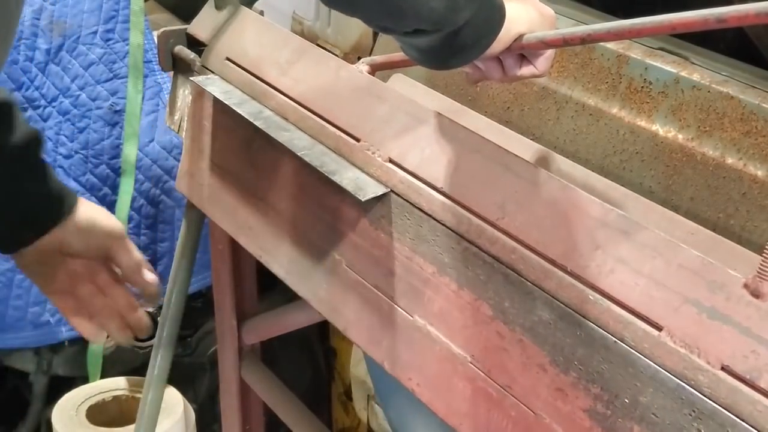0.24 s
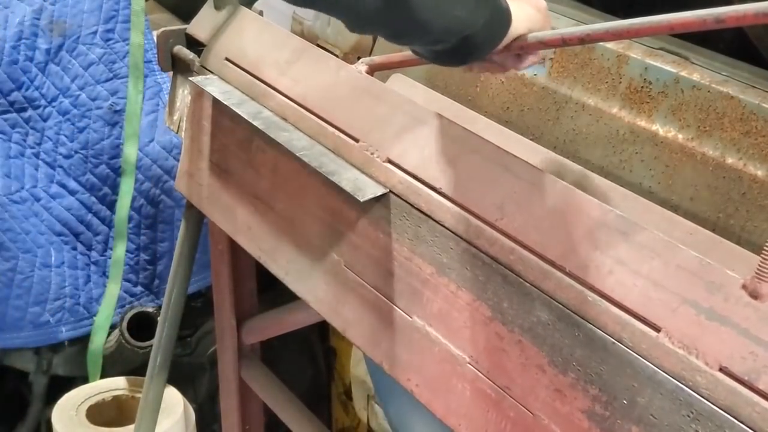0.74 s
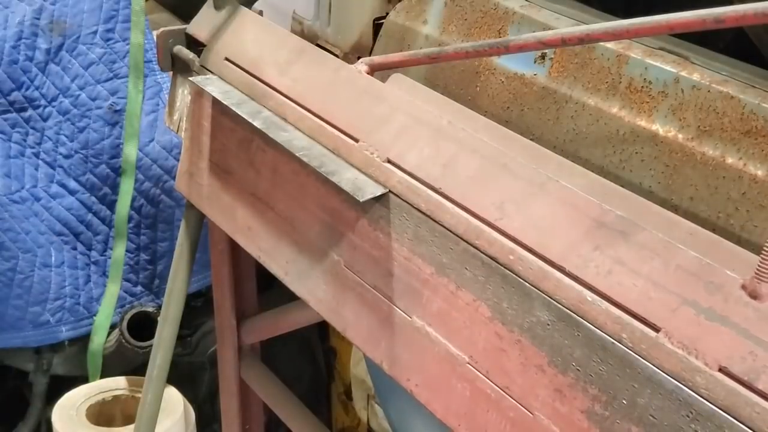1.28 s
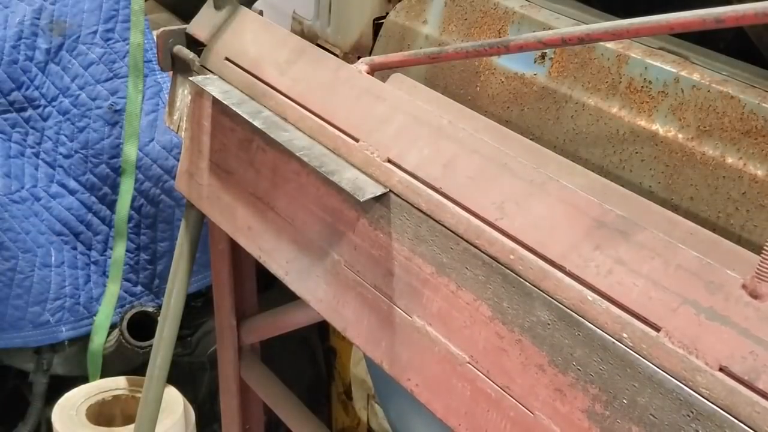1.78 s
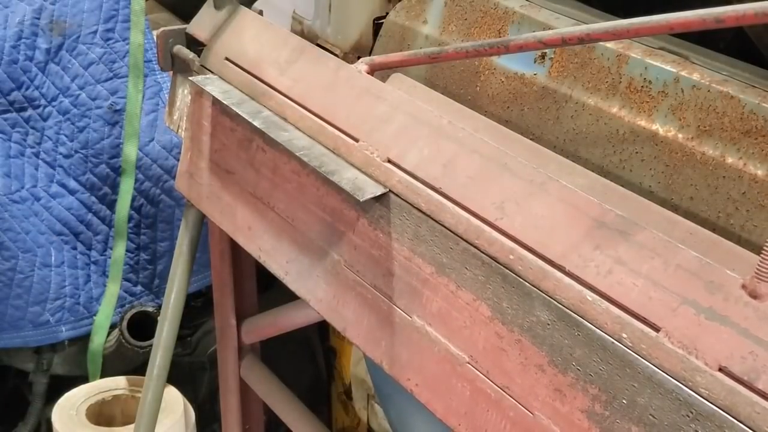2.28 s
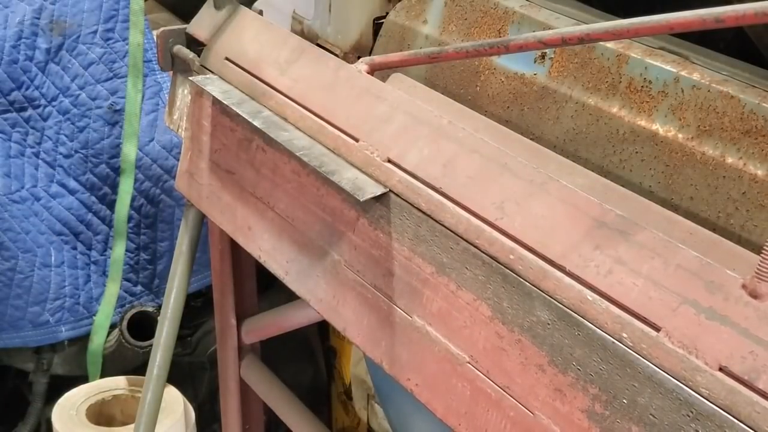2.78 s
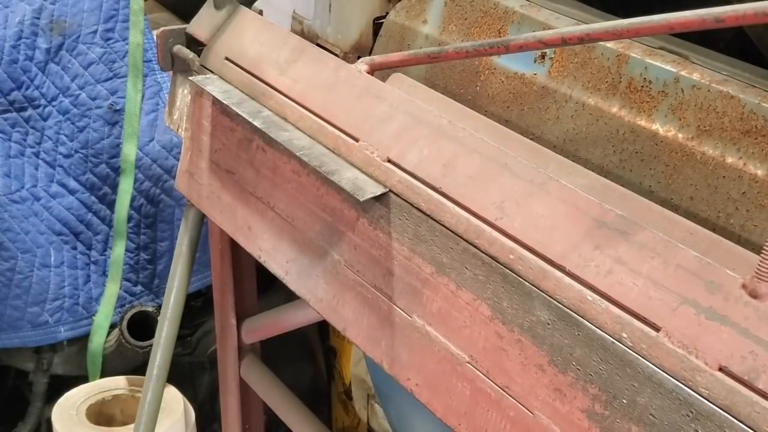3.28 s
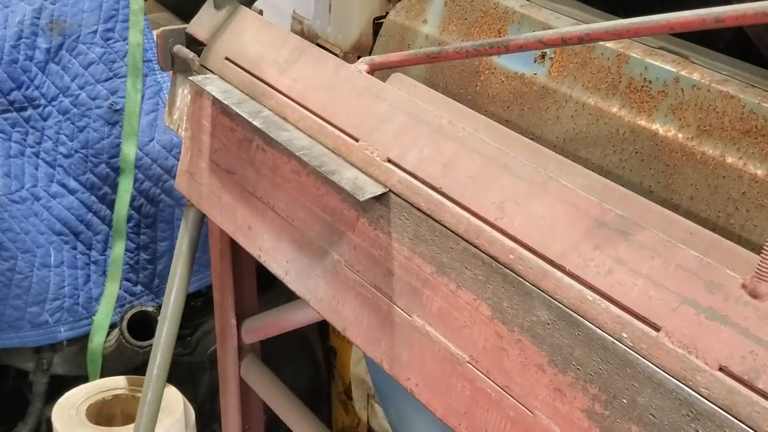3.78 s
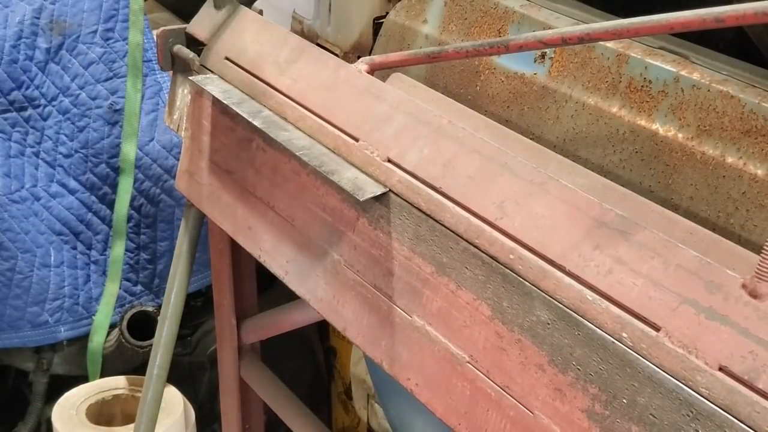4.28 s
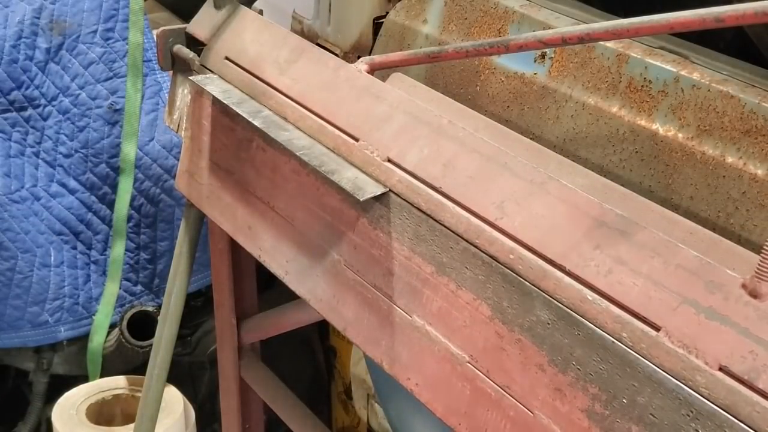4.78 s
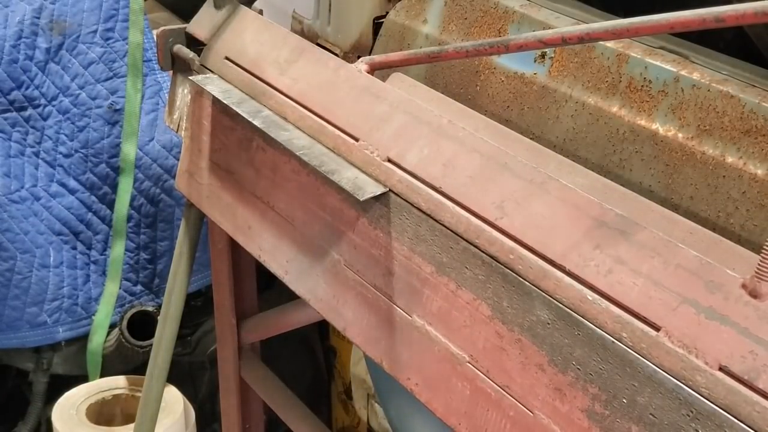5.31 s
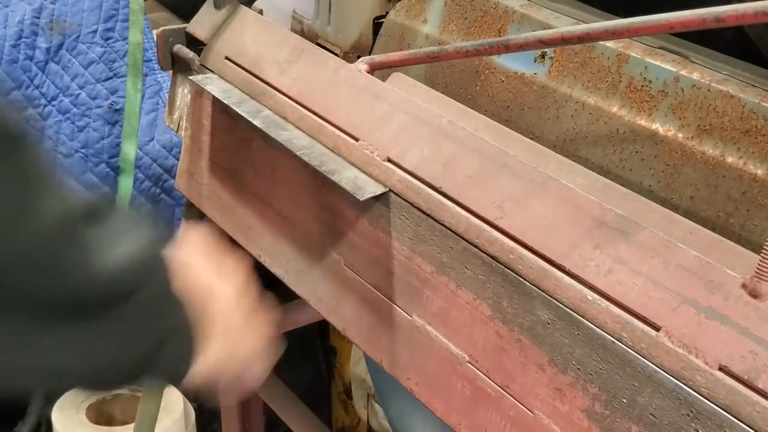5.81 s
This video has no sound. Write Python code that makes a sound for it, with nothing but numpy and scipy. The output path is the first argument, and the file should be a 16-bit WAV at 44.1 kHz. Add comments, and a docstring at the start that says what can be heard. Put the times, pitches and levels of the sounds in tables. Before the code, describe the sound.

A metal brake handle knocks back, feet scuff on grit, then a heavy steel plate is dragged in two harsh, screeching, ringing pulls in a workshop.

```python
"""A workshop with a manual sheet metal brake: its handle drops back and knocks; someone steps away on grit.
Out of sight a steel plate is dragged in two long pulls, then shifted once more with a light clank.
Streams of random fractures, coloured and enveloped, make rasp, grit, judder and scuffs.
Noise-fed resonators make the plate ring; pumped ones screech; clicks into resonators knock, thud and tick.
Filtered noise makes the air and the floor rumble; a dense decaying tail makes the room."""
import sys
import numpy as np
from scipy import signal
from scipy.fft import rfft, irfft, next_fast_len
from scipy.io import wavfile
from scipy.ndimage import map_coordinates

SR = 44100
rng = np.random.default_rng(int(sys.argv[2]) if len(sys.argv) > 2 else 0)


def unload_audio(sound):
    """Save the sound as a 16-bit wav file, at the path given as the first command line argument."""
    columns = np.transpose(np.atleast_2d(sound))
    # keep every value between -1 and 1, then stretch to whole-number steps
    steps = np.round(np.clip(columns, -1, 1) * 32767)
    wavfile.write(sys.argv[1], SR, steps.astype(np.int16))


N = 266805
TIME = np.arange(N) / SR


def from_db(db):
    """Decibels to gain."""
    return 10 ** (np.asarray(db) / 20)


def rms_one(x):
    """Scale to rms 1."""
    return x / np.sqrt(np.mean(x ** 2) + 1e-20)


def at_hz(points, hz):
    """Read a table on a log-frequency axis."""
    known_hz, values = np.transpose(points)
    return np.interp(np.log(np.maximum(hz, 1)), np.log(known_hz), values)


def drift(per_s):
    """Random line through `per_s` normal values a second."""
    return np.interp(TIME * per_s, np.arange(8000), rng.standard_normal(8000))


def envelope(s, rise_s, length_s, t60_s):
    """Rise from `s`, hold until `length_s` is over, then die away."""
    rise = np.clip((TIME - s) / rise_s, 0, 1)
    return rise * from_db(-60 * np.clip((TIME - s - length_s) / t60_s, 0, 2))


def strokes(rows, shape):
    """Sum rows of (s, duration, dB, dB) into two strengths; `shape` maps start and duration to an envelope."""
    return sum(from_db([[first], [second]]) * shape(s, duration) for s, duration, first, second in rows)


def ring(force, hz, t60_s):
    """Damped resonator: a unit click starts a sine of height 1."""
    r = from_db(-60 / (t60_s * SR))
    w = 2 * np.pi * hz / SR
    return signal.lfilter([0, np.sin(w)], [1, -2 * r * np.cos(w), r * r], force + 1e-18)


# Left-right likeness. Each row: frequency in Hz, likeness from 0 to 1.
LIKENESS = [(60, .99), (110, .99), (200, .99), (380, .95), (700, .55), (1290, .25), (2400, .1), (4400, 0),
            (8100, .3), (15000, .58)]


def two_ears(pair, hz, likeness=LIKENESS):
    """Mix two unrelated signals to left and right with the likeness set for `hz`."""
    alike = np.clip(at_hz(likeness, hz), -.99, .99)
    mid = np.sqrt((1 + alike) / 2) * pair[0]
    side = np.sqrt((1 - alike) / 2) * pair[1]
    return np.array([mid + side, mid - side])


def coloured(pair, spectrum, likeness=LIKENESS):
    """Shape a steady pair in spectrum and stereo width; rms 1."""
    size = next_fast_len(N)
    hz = np.arange(size // 2 + 1) * SR / size
    bins = two_ears(rfft(pair, size), hz, likeness) * from_db(at_hz(spectrum, hz))
    return rms_one(irfft(bins, size)[:, :N])


def grains(per_s, spread_db):
    """Two streams of tiny fractures at random moments; sizes spread exponentially in dB, up or down."""
    sizes = from_db(spread_db * np.minimum(rng.exponential(1, (2, N)), 4))
    signed = sizes * rng.choice([-1, 1], (2, N))
    return rms_one(signed * (rng.random((2, N)) < per_s / SR))


def shifting(x, depth_db, width_hz, per_s):
    """A travelling contact feeds ever different resonances: narrow bands swell and fade."""
    hz, s, cells = signal.stft(x, SR, nperseg=1024)
    field = rng.standard_normal((400, 600))
    where = np.meshgrid(hz / width_hz, s * per_s, indexing="ij")
    swell = map_coordinates(field, where, order=1, mode="wrap")
    return rms_one(signal.istft(cells * from_db(depth_db * swell), SR)[1][:, :N])


def rubbed(modes, strength, wander_db):
    """Friction feeds each mode unevenly as the contact moves; each rings on when the force ends."""
    out = 0
    for hz, db, t60_s in modes:
        force = rng.standard_normal((2, N)) * strength * from_db(wander_db * drift(7.3))
        fed = ring(force, hz, t60_s)
        even = np.sqrt(4 * np.log(1000) / (t60_s * SR))  # equal rms whatever the decay
        out = out + from_db(db) * even * two_ears(fed, hz)
    return out


def struck(blows, modes, crunch, crunch_s):
    """A click and a brief crunch, low-passed by the softness of the contact, drive the modes."""
    out, t = np.zeros(N + SR), TIME[:SR // 2]
    for s, db, hardness_hz in blows:
        force = (t == 0) + crunch * rng.standard_normal(len(t)) * np.exp(-t / crunch_s)
        soften = signal.butter(2, min(hardness_hz, SR / 3), fs=SR, output="sos")
        force = signal.sosfilt(soften, force)
        sound = 0
        for k, (hz, level_db, t60_s) in enumerate(modes):
            sound = sound + (-1) ** k * from_db(level_db) * ring(force, hz, t60_s)
        start = max(round(s * SR), 0)
        out[start:start + len(t)] += from_db(db) * sound / np.abs(sound).max()
    return out[:N]


# Decay of the workshop. Each row: frequency in Hz, t60 in seconds.
SHOP_T60 = [(100, 0.23), (400, 0.8), (1500, 0.59), (4500, 0.29), (9000, 0.3), (16000, 0.08)]


def workshop(x, wet_db):
    """Direct sound plus a dense tail from the cluttered shop, each band with its own decay."""
    t, tail = TIME[:SR * 3 // 4], 0
    edges_hz = np.geomspace(50, 18000, 11)
    for low, high in zip(edges_hz, edges_hz[1:]):
        hz = np.sqrt(low * high)
        band_pass = signal.butter(2, [low, high], "band", fs=SR, output="sos")
        band = signal.sosfilt(band_pass, rng.standard_normal((2, len(t))))
        tail = tail + two_ears(band, hz) * from_db(-60 * t / at_hz(SHOP_T60, hz))
    tail = rms_one(tail * (t > .004)) / np.sqrt(len(t))
    wet = from_db(wet_db)
    echo = signal.fftconvolve(x * np.ones((2, 1)), tail, axes=1)[:, :N]
    return (x + wet * echo) / np.hypot(1, wet)


# Someone moves about. Each row: start in seconds, length in seconds, rustle in dB, rumble in dB.
MOVES = [(-.2, 3.72, -59.5, -69), (4.3, 3.2, -58.5, -57.5)]
# Colour of the air and rustle. Each row: frequency in Hz, relative density in dB per Hz.
AIR_COLOUR = [(25, -24.5), (50, 4), (85, -4), (140, -7.5), (210, -5.5), (300, -7), (500, -6.5), (900, -8.5),
              (2000, -14.5), (4000, -14), (7000, -20), (9000, -23), (16000, -24)]
# Colour of the floor rumble. Each row: frequency in Hz, relative density in dB per Hz.
RUMBLE_COLOUR = [(25, -26.5), (50, 6), (85, 12), (125, 2.5), (170, -1), (300, -19), (1000, -72)]
# Likeness for air and sand: wide in the middle, narrow in the top treble.
# Each row: frequency in Hz, likeness from 0 to 1.
AIR_SAND_LIKENESS = [(60, .99), (200, .98), (380, .92), (700, .6), (1290, .15), (4400, 0), (7000, .15),
                     (8500, .9), (15000, .94)]
MOVE_RISE_S, MOVE_T60_S = 0.083, 1
STILL_AIR_DB, STILL_RUMBLE_DB = -57, -70.5  # nobody moving
JUDDER_TO_FLOOR_DB = -15.5


def background(judder):
    """Noise of air and floor, raised by someone moving; the shuddering plate shakes the floor."""
    rustle, weight = strokes(MOVES, lambda s, length: envelope(s, MOVE_RISE_S, length, MOVE_T60_S))
    shaking = from_db(STILL_RUMBLE_DB) + weight + from_db(JUDDER_TO_FLOOR_DB) * judder
    rumble = shaking * coloured(rng.standard_normal((2, N)), RUMBLE_COLOUR)
    air = coloured(rng.standard_normal((2, N)), AIR_COLOUR, AIR_SAND_LIKENESS)
    return rumble + (from_db(STILL_AIR_DB) + rustle) * air


# Soles and shifted steel on the floor.
# Each row: start in seconds, length in seconds, rub in relative dB, grit in relative dB.
SCUFFS = [(.25, 0.028, -44.5, -50), (.286, 0.13, -38, -44.5), (.41, .07, -64.5, -56),
          (.630, 0.047, -44, -47.5), (.90, 0.078, -50, -45), (.945, 0.089, -45, -59),
          (1.156, 0.017, -45.5, -46.5), (1.422, 0.072, -42.5, -43), (1.84, .055, -54.5, -57),
          (1.945, .018, -60, -50), (2.056, 0.043, -48.5, -45.5), (2.15, 0.26, -49.5, -53),
          (2.262, 0.054, -39, -42.5), (2.365, 0.049, -32, -41), (4.235, 0.042, -57.5, -67),
          (4.305, 0.091, -47, -49.5), (4.466, .028, -57, -46.5), (5.90, 0.039, -37.5, -56),
          (5.958, 0.016, -39.5, -46)]
# Colour of the rub. Each row: frequency in Hz, relative density in dB per Hz.
RUB_COLOUR = [(100, -20), (400, -5.5), (850, -3), (1200, -4.5), (1700, 0), (2300, -0.5), (3000, -0.5),
              (4300, -2.5), (5500, -7.5), (7000, -8), (8500, -15), (16000, -39)]
# Colour of rolling sand. Each row: frequency in Hz, relative density in dB per Hz.
SAND_COLOUR = [(3000, -2), (6500, -1), (8500, -3), (11500, 0.5), (14000, 0), (16000, -2.5)]
SCUFF_RISE_SHARE, SCUFF_T60_S = 0.34, 0.27  # rise as a share of the length


def scuffs():
    """Short slides rub the concrete and roll fine sand: two streams of fractures."""
    rub, grit = strokes(SCUFFS, lambda s, length: envelope(s, SCUFF_RISE_SHARE * length, length, SCUFF_T60_S))
    uneven = from_db(1.0 * drift(90))
    sole = coloured(grains(per_s=14000, spread_db=0.5), RUB_COLOUR)
    sand = coloured(grains(per_s=4800, spread_db=-9.5), SAND_COLOUR, AIR_SAND_LIKENESS)
    sand = sand * from_db([[1.8], [-1.8]])  # leans left
    return workshop(rub * uneven * sole, wet_db=-5.5) + from_db(0.5) * grit * uneven * sand


# Heavy, dull floor contacts. Each row: start in seconds, relative peak in dB, hardness (low-pass) in Hz.
THUDS = [(.638, -37, 131), (1.038, -37, 129), (1.421, -30, 172), (1.473, -27.5, 460), (1.538, -37.5, 159),
         (1.944, -39.5, 200), (2.051, -19, 795), (2.060, -31, 1100), (3.186, -26.5, 199),
         (3.220, -22.5, 231), (3.252, -34, 170), (4.475, -38, 141), (4.635, -38, 590), (4.866, -25.5, 328),
         (4.915, -36, 151), (5.018, -42, 200), (5.538, -21, 704), (5.670, -21.5, 327)]
# Floor and load. Each row: frequency in Hz, relative level in dB, t60 in seconds.
THUD_MODES = [(89, -2, 0.05), (118, 0, 0.039), (190, -1.5, 0.026), (241, -3, 0.055), (294, -7, 0.027),
              (401, -11.5, 0.086), (493, 1.5, 0.0099), (760, 4, 0.012), (1100, 3.5, 0.014),
              (1620, 9, 0.012)]


def thuds():
    """Soft blows excite the short modes of floor and load."""
    blows = struck(THUDS, THUD_MODES, crunch=0.023, crunch_s=0.014)
    return from_db(-0.9) * workshop(blows, wet_db=-7.0)


# Knocks on the steelwork. Each row: start in seconds, relative peak in dB, hardness (low-pass) in Hz.
KNOCKS = [(.001, -31, 1900), (.028, -34, 1800), (.048, -39, 2000), (.065, -49, 1800), (.1455, -32, 950),
          (.155, -41, 1100), (4.866, -31, 1100), (5.972, -27, 2000)]
# The steelwork. Each row: frequency in Hz, relative level in dB, t60 in seconds.
FRAME_MODES = [(318.5, -4, 0.081), (386, -7.5, 0.073), (469, -12, 0.21), (529, -11, 0.28),
               (695, 0.5, 0.056), (721, -12.5, 0.087), (856, 9, 0.015), (1280, 7.5, 0.034),
               (1490, 14, 0.029), (2000, 17.5, 0.0051), (2590, 10, 0.0095)]


def knocks():
    """Harder blows excite the modes of the steelwork."""
    blows = struck(KNOCKS, FRAME_MODES, crunch=0.11, crunch_s=0.027)
    return from_db(8.0) * workshop(blows, wet_db=-12.5)


# The plate settles. Each row: start in seconds, relative peak in dB, hardness (low-pass) in Hz.
TICKS = [(3.577, -29.5, 8000)]
# The tapped plate edge. Each row: frequency in Hz, relative level in dB, t60 in seconds.
TICK_MODES = [(1316, -29, .6), (2700, -4, .006), (3886, -25, .2), (4600, 0, .005), (6600, -3, .003)]


def tick():
    """The plate settles with a light tick: a hard tap on its edge modes."""
    return workshop(struck(TICKS, TICK_MODES, crunch=0.12, crunch_s=0.0049), wet_db=6.0)


# Brief screeches and groans where the slip locks in.
# Each row: start in seconds, length in seconds, pitch in Hz, relative level in dB, t60 in cycles.
SCREECHES = [(0.283, 0.064, 3000, -37.5, 18), (0.968, 0.048, 3260, -44, 15), (2.893, 0.13, 4170, -29, 55),
             (2.995, 0.097, 4300, -33, 37), (3.11, 0.075, 1024, -29, 21), (3.164, 0.087, 122, -36, 17),
             (3.174, 0.069, 334, -36, 29), (4.307, .045, 3230, -49.5, 11), (5.328, 0.048, 4350, -22.5, 63),
             (5.399, 0.046, 5170, -25, 55), (5.411, 0.2, 308, -35.5, 66), (5.951, 0.046, 667, -33, 40),
             (5.926, 0.11, 953, -39.5, 68)]


def screeches():
    """Quick, uneven slips pump one damped resonance for a moment."""
    out, slips = 0, grains(per_s=1400, spread_db=-5.0)
    for s, length_s, hz, db, cycles in SCREECHES:
        swell = np.sqrt(np.abs(np.sin(np.pi * np.clip((TIME - s) / length_s, 0, 1))))
        tone = rms_one(two_ears(ring(slips, hz, cycles / hz), hz))
        out = out + from_db(db) * swell * tone
    return from_db(1.5) * workshop(out, wet_db=-8.5)


# The plate slides, two rows to a pull, with a stall between them.
# Each row: start in seconds, length in seconds, rasp in relative dB, ring in relative dB.
SLIDES = [(2.329, 0.3, -29, -32.5), (2.681, 0.58, -26, -30), (4.934, 0.64, -25.5, -32.5),
          (5.6, 0.092, -26, -33)]
# The edge catches and breaks free.
# Each row: start in seconds, t60 in seconds, rasp in relative dB, grit in relative dB.
CATCHES = [(2.413, 0.65, -23, -26), (2.494, 0.095, -21.5, -18), (2.688, 0.35, -15.5, -18),
           (2.898, 0.18, -51, -29), (2.98, 0.21, -27, -27), (3.095, 0.14, -25, -32), (4.875, 0.5, -30, -36),
           (5.021, 0.12, -17.5, -21.5), (5.342, 0.78, -23, -23), (5.395, .25, -45, -27.5),
           (5.613, 0.13, -19, -20), (5.664, 0.04, -28.5, -44)]
# The plate bears down hard and shudders.
# Each row: start in seconds, length in seconds, judder in relative dB, ring in relative dB.
SHUDDERS = [(2.485, 0.037, -40.5, -21), (3.115, 0.023, -35.5, -29), (3.175, 0.12, -42.5, -64),
            (4.865, 0.029, -40, -30), (5.01, 0.047, -38.5, -28), (5.29, 0.067, -43.5, -26.5),
            (5.41, 0.35, -43.5, -47)]
SLIDE_RISE_S, SLIDE_T60_S, GRIT_T60_S = 0.085, 0.41, 0.35
CATCH_RISE_S, CATCH_HOLD_S = 0.0046, 0.0079
SHUDDER_RISE_S, SHUDDER_T60_S = 0.022, 0.099
GRIT_DB, JUDDER_DB = -5.5, -18.5  # against the rasp of a slide


def pull_strengths():
    """All four strengths follow the slide; catches add rasp and grit, shudders add judder and ring."""
    slide, singing = strokes(SLIDES, lambda s, length: envelope(s, SLIDE_RISE_S, length, SLIDE_T60_S))
    cracking, _ = strokes(SLIDES, lambda s, length: envelope(s, SLIDE_RISE_S, length, GRIT_T60_S))
    catch_s = CATCH_RISE_S + CATCH_HOLD_S
    rasp, grit = strokes(CATCHES, lambda s, t60: envelope(s, CATCH_RISE_S, catch_s, t60))
    judder, ringing = strokes(
        SHUDDERS, lambda s, length: envelope(s, SHUDDER_RISE_S, length, SHUDDER_T60_S))
    all_grit = from_db(GRIT_DB) * cracking + grit
    all_judder = from_db(JUDDER_DB) * slide + judder
    return slide + rasp, all_grit, singing + ringing, all_judder


# Colour of the rasping edge. Each row: frequency in Hz, relative density in dB per Hz.
RASP_COLOUR = [(300, -20), (600, -17.5), (1050, 0), (1500, -5), (1950, -4.5), (2350, -4.5), (2800, 2.5),
               (3350, -2), (4000, 2.5), (4550, 4.5), (5300, -3), (7000, -3.5), (8300, -9), (15000, -14)]
# Colour of cracking grit. Each row: frequency in Hz, relative density in dB per Hz.
GRIT_COLOUR = [(4000, -18), (7000, -8.5), (8500, -7), (10000, -5), (11500, 5), (12700, -2), (14200, 2),
               (16000, -3.5)]
# Colour of the judder. Each row: frequency in Hz, relative density in dB per Hz.
JUDDER_COLOUR = [(30, -33.5), (55, -38), (120, -33), (170, -2), (280, -9.5), (480, 0.5), (700, 0.5),
                 (1300, -20.5)]
# The plate, rubbed along its edge. Each row: frequency in Hz, relative level in dB, t60 in seconds.
PLATE_MODES = [(790, -6, 0.19), (960.5, -2.5, 0.31), (983, -10, 0.15), (1033, -2, 0.16), (1104.4, -8, 0.18),
               (1165, -2.5, 0.31), (1295, -3.5, 0.12), (1497, -4.5, 0.018), (1682, -8.5, 0.22),
               (2630, -8.5, 0.078), (2606, -8, 0.54), (2876, -35, 0.042), (3017, -10.5, 0.071),
               (3580, -30, 0.19), (3890, -1, 0.36), (4350, -31, 0.12), (4200, -36, .1), (4800, -8, 0.0798),
               (4610, -9, 0.17), (5880, -3, 0.086)]
# Slow flexing of the whole plate. Each row: frequency in Hz, relative level in dB, t60 in seconds.
FLEX_MODES = [(115.6, -4, 0.37), (210.6, 1.5, 0.19), (261, -7, 0.45), (292.6, -3.5, 0.23),
              (318, 0.5, 0.075), (405.5, 2, 0.21)]


def dragged_plate(rasp, grit, ringing, judder):
    """The edge sticks and slips over grit, which cracks under it and keeps the plate ringing."""
    slip = from_db(0.8 * drift(220) + 1.6 * drift(45))
    edge = coloured(grains(per_s=5000, spread_db=1.0), RASP_COLOUR)
    edge = shifting(edge, depth_db=6.0, width_hz=189, per_s=22)
    edge = edge * slip * from_db(-2.0) * rasp
    crushed = coloured(grains(per_s=5000, spread_db=-4.0), GRIT_COLOUR)
    crushed = shifting(crushed, depth_db=5.0, width_hz=240, per_s=31)
    crushed = crushed * slip * from_db(-1.5) * grit
    crushed = crushed * from_db([[1.5], [-1.5]])  # leans left
    shudder = coloured(grains(per_s=900, spread_db=6.5), JUDDER_COLOUR)
    shudder = shudder * from_db(0.5) * judder * from_db(2.0 * drift(60))
    rings = rubbed(PLATE_MODES, from_db(-10.0) * slip * ringing, wander_db=2.0)
    flex = rubbed(FLEX_MODES, from_db(-12.0) * judder, wander_db=8.0)
    return workshop(edge + crushed, wet_db=-4.0) + workshop(rings + flex + shudder, wet_db=-11.0)


def scene():
    """Plate, feet and knocks over the quiet air of the shop."""
    rasp, grit, ringing, judder = pull_strengths()
    contacts = scuffs() + thuds() + knocks() + tick() + screeches()
    return background(judder) + contacts + dragged_plate(rasp, grit, ringing, judder)


LEAD_S = 0.00032  # the left hears everything below about 3 kHz slightly earlier
LOW_CUT_HZ, CUTOFF_HZ = 42, 15750


def record(dry):
    """Bass and middle reach the left first; the microphone loses the deepest bass; the top is cut."""
    size = next_fast_len(N + 1024)
    hz = np.arange(size // 2 + 1) * SR / size
    turns = np.minimum(hz * LEAD_S, 1)  # a full turn, so no lag, above 1 / LEAD_S
    right = irfft(rfft(dry[1], size) * np.exp(-2j * np.pi * turns), size)[:N]
    ears = np.array([dry[0], right])
    thin = signal.sosfilt(signal.butter(2, LOW_CUT_HZ, "high", fs=SR, output="sos"), ears)
    return signal.sosfilt(signal.ellip(12, .1, 90, CUTOFF_HZ, fs=SR, output="sos"), thin)


dry = scene()
out = record(dry)
unload_audio(out)
```